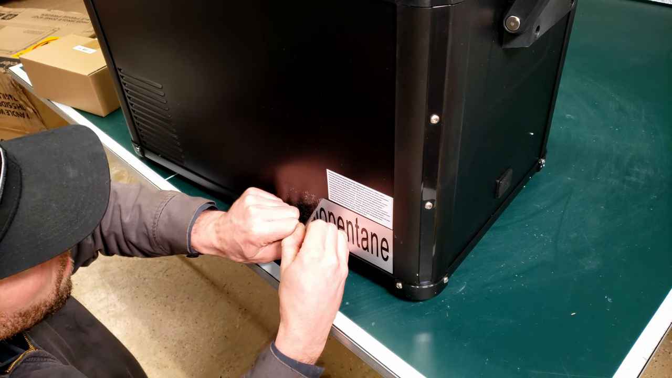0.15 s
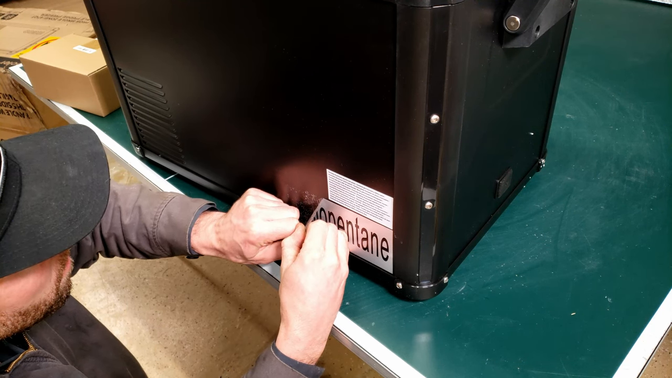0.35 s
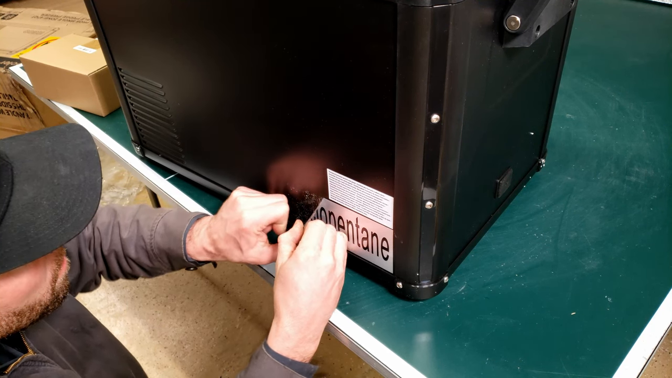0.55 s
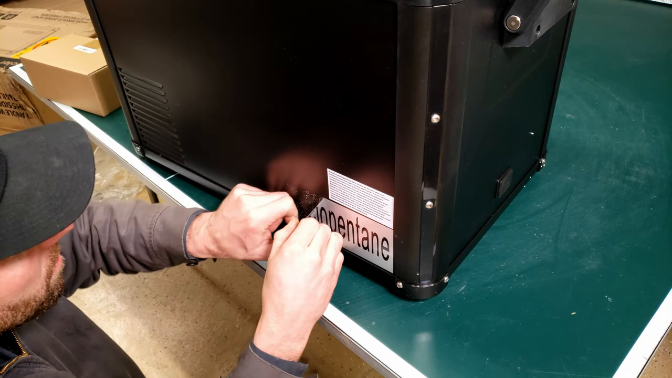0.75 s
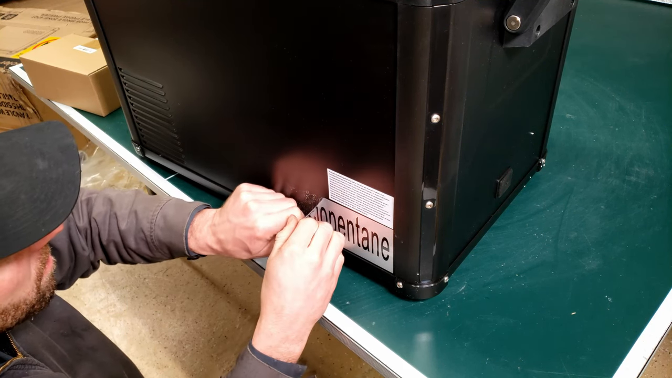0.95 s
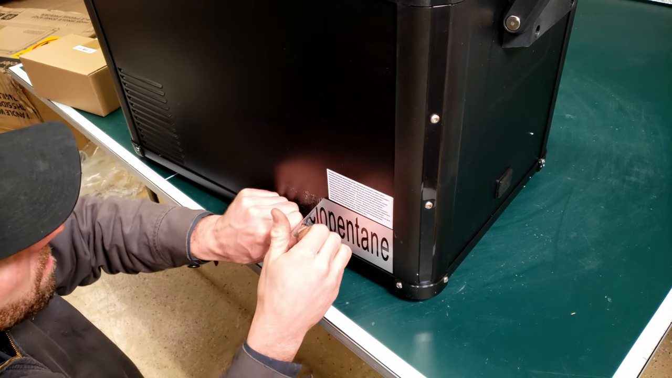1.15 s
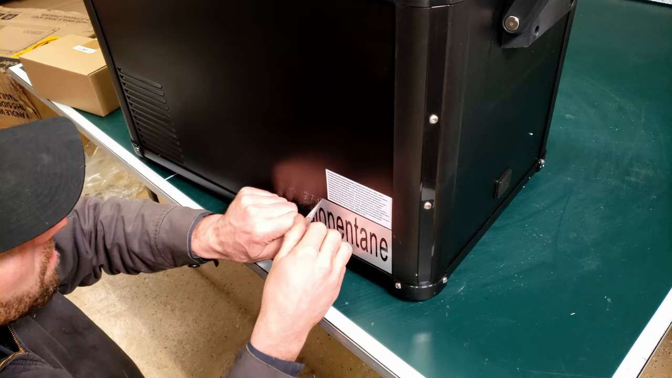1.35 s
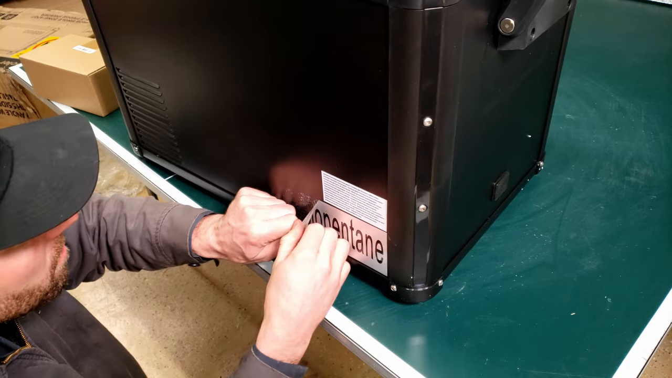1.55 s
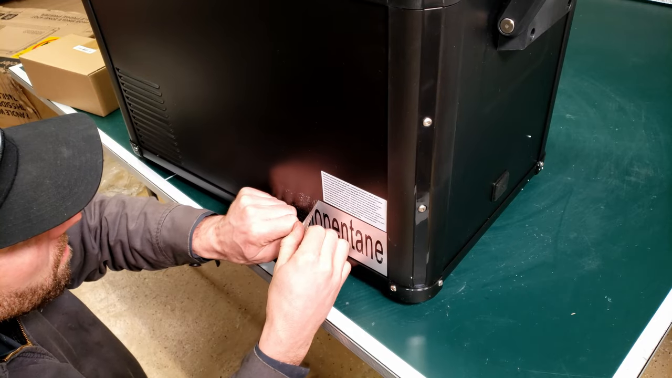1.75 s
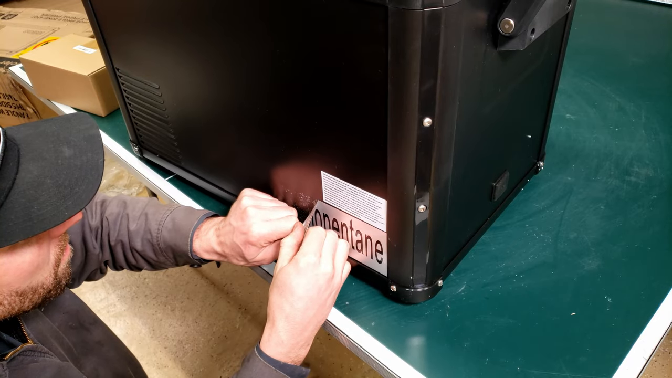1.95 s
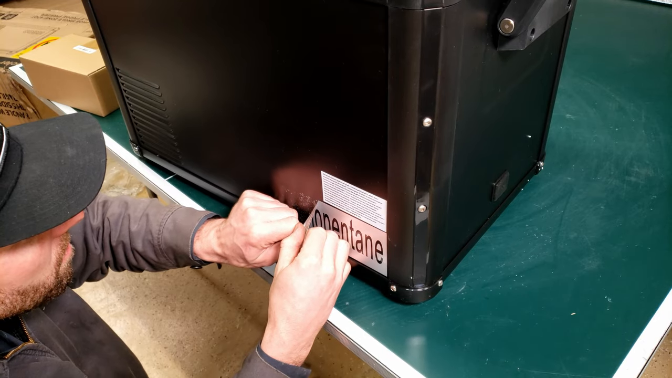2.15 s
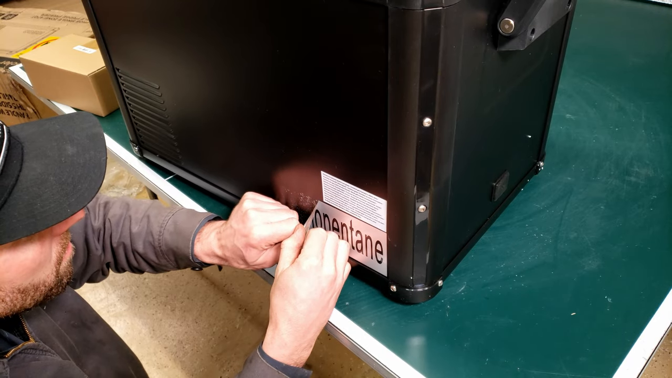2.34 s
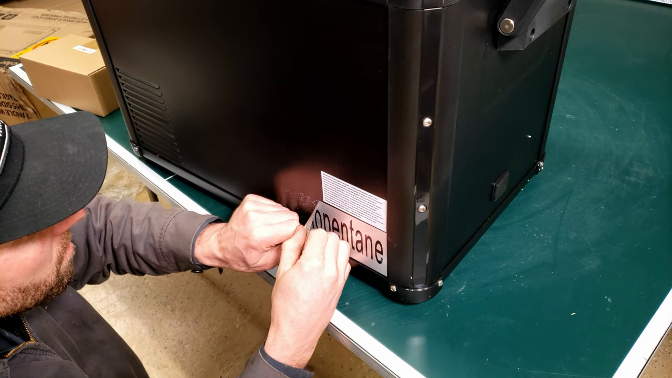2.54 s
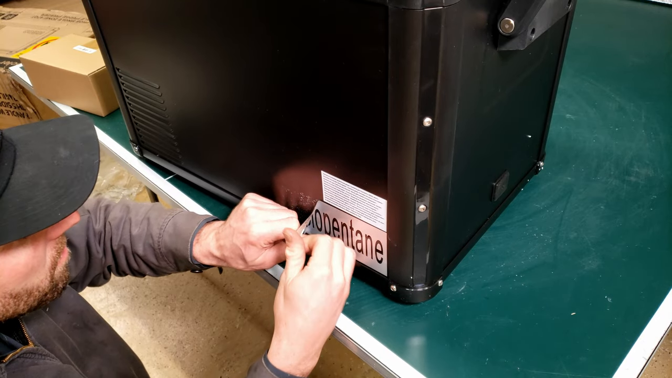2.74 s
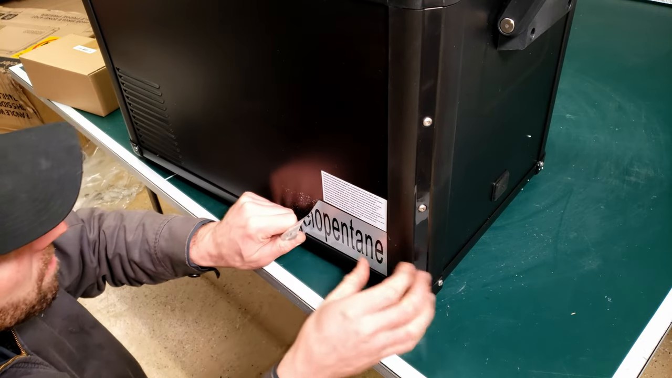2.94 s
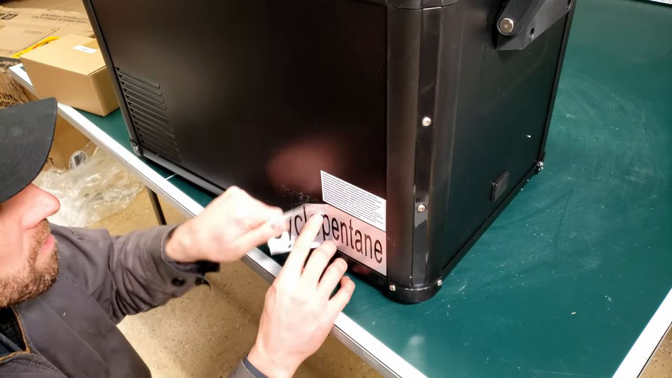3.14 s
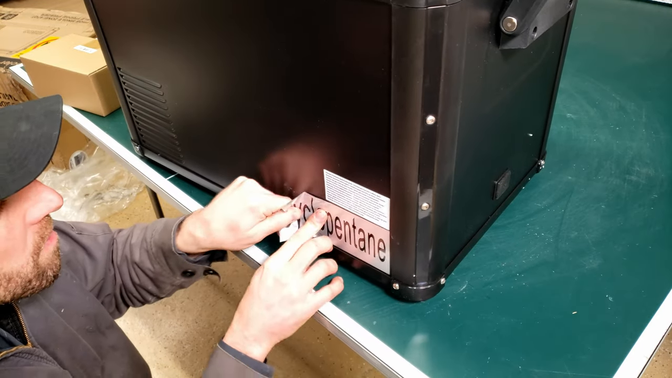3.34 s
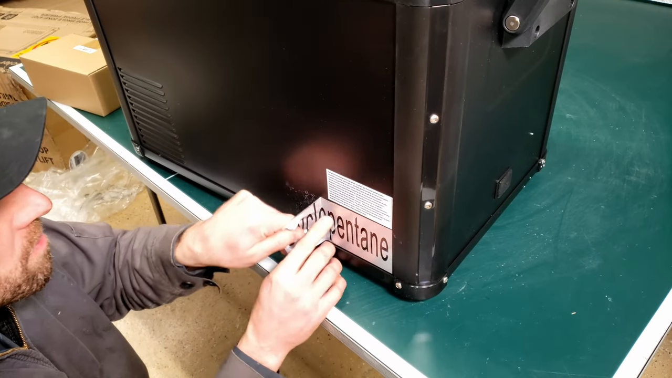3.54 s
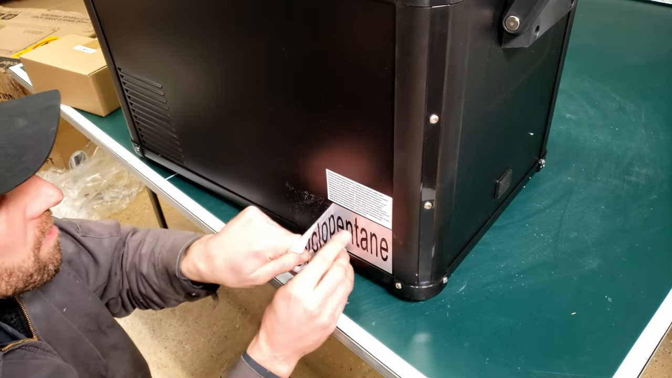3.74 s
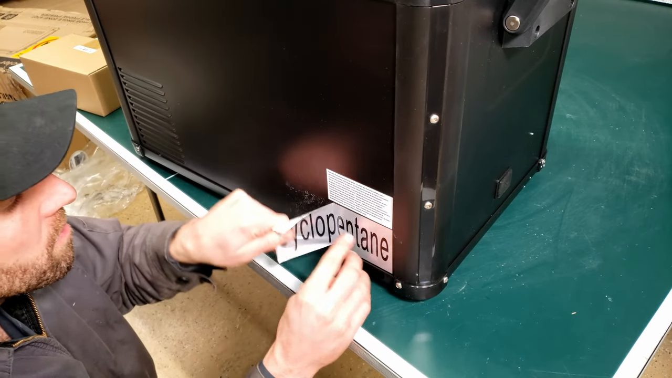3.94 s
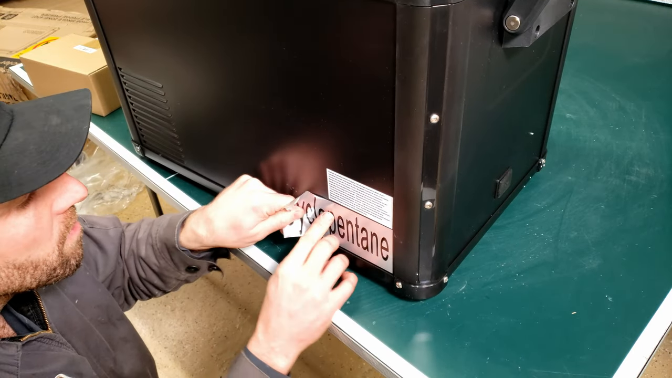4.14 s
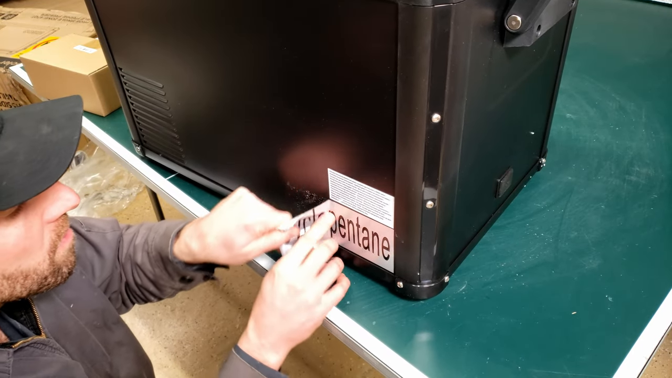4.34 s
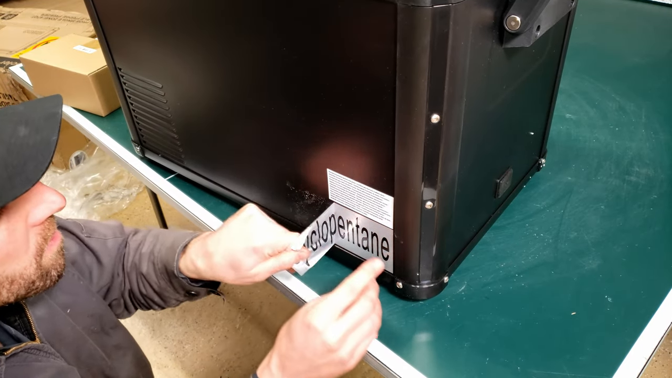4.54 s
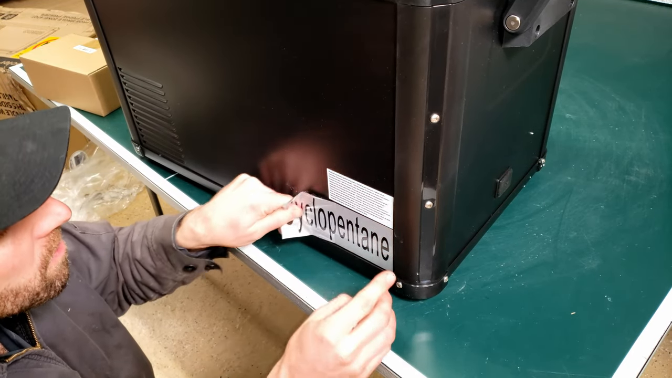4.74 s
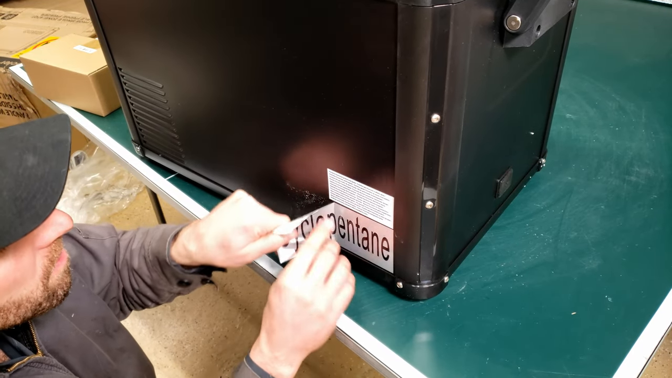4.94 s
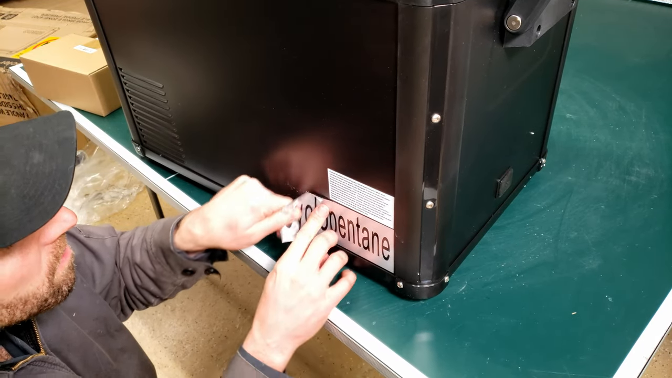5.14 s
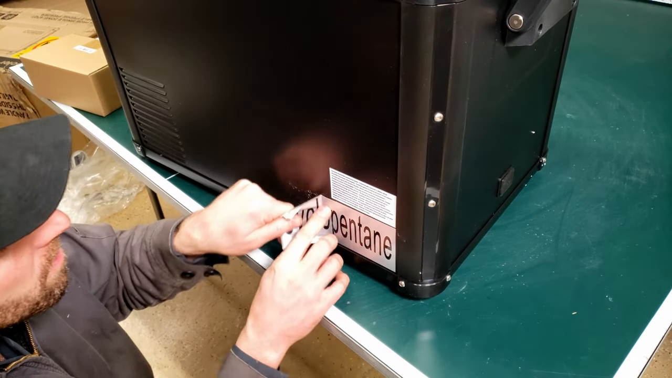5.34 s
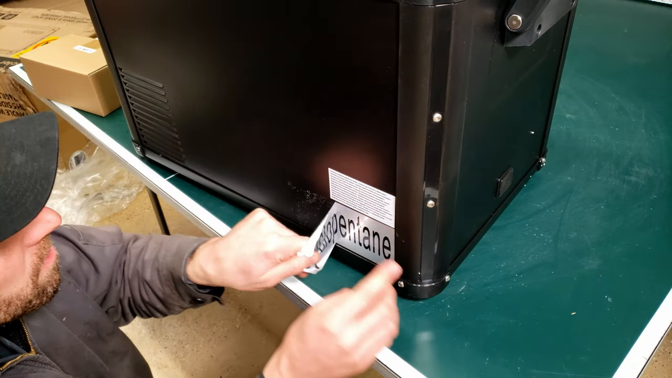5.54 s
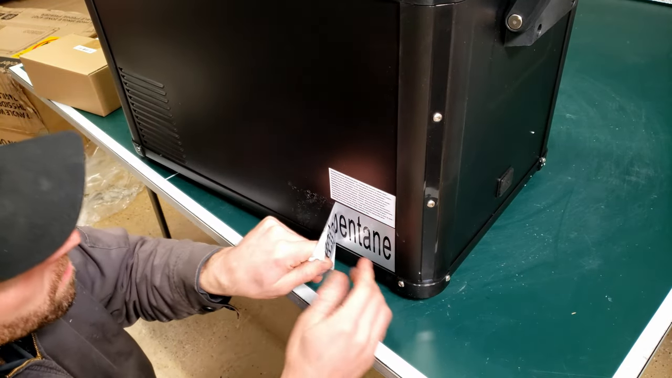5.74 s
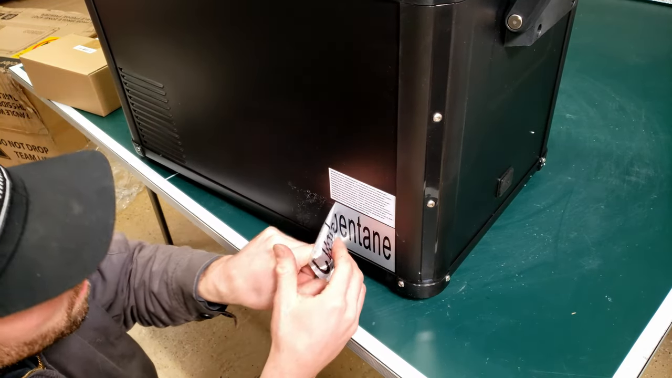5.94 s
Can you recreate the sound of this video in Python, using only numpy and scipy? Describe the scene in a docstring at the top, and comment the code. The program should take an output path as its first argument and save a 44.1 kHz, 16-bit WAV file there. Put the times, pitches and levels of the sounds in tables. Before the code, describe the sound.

Fingers pick at a stubborn adhesive label on a metal cabinet. Glue lets go in tiny dry clicks: a delicate sizzle first, a quick bright rip, isolated ticks, another slow creep, then uneven tugs that crackle and pop, some making the panel resonate briefly. Sleeves rub softly and fingertips thud dully. Close stereo pickup, slightly left, in a short-reverberant indoor room with faint hum and still air.

```python
"""Sticker torn off a fridge

A sticker is picked and torn off the side of a small fridge on a workshop table.
The glue lets go in tiny slips: a fine fizz when it creeps, crackling rips and single snaps when tugged.
Random clicks stand for the slips; filtered, they sound as the loose flap, the glue line and the metal panel.
Shaped noise gives rubbing hands, sagging sines soft bumps; a faint hum, still air and a short room surround them."""
import sys
import numpy as np
from scipy import signal
from scipy.fft import rfft, irfft
from scipy.io import wavfile
from scipy.ndimage import uniform_filter1d

SR = 44100
rng = np.random.default_rng(int(sys.argv[2]) if len(sys.argv) > 2 else 0)


def store_pcm(level_fs):
    """Save levels as 16-bit WAV."""
    pcm = np.round(np.clip(level_fs, -1, 1) * 32767).astype(np.int16)
    wavfile.write(sys.argv[1], SR, np.atleast_2d(pcm).T)


N = 268304
TIME = np.arange(N) / SR

# Tugs at the sticker. Levels are relative, ahead of the filters and trims of the radiating parts.
# Each row: start in seconds, swelling in seconds, easing in seconds, swell in dB, flap drive at the crest in dB,
# then the shares of panel, sharp crack and sizzle against the flap in dB.
TUGS = [ (0.463, 0.046, 0.028, 14.5, -39.5, -10.5, -2, 1.5), (0.538, 0.048, 0.02, 2.5, -35, -7, -15, -8.5),
        (1.052, .016, 0.015, 13, -48.5, 1, 0, 4), (1.247, 0.017, 0.015, 5.5, -65, 2.5, -2, 0.5),
        (1.354, 0.059, .012, 8.5, -50.5, -5, -7, -8), (2.653, 0.0084, 0.024, 15.5, -61, 0.5, 5.5, 5.5),
        (2.684, 0.027, 0.041, 17, -43.5, -11.5, -0.5, -3.5), (2.954, 0.056, 0.026, 1, -61, 1.5, -3, 3),
        (3.122, 0.03, .044, 13, -52, -13, -6.5, -2.5), (3.369, 0.047, 0.031, 5.5, -50.5, -11, -3, -0.5),
        (3.462, 0.013, 0.012, 28, -50, 0.5, 3.5, 2), (3.669, 0.027, 0.02, 7, -28.5, 4.5, 1, 3),
        (3.955, 0.094, 0.012, 3.5, -61.5, -4, -2, 2.5), (4.207, 0.011, 0.004, 7.5, -58, -4.5, 4, -9),
        (4.288, 0.069, .008, 11.5, -40.5, -7, -3.5, 0), (4.37, 0.044, 0.032, 1.5, -32.5, 2.5, 2.5, 5),
        (4.672, .020, 0.045, 11.5, -51.5, -10, -4, -4.5),
        (4.872, 0.061, 0.014, 11.5, -42.5, -17, -4.5, -1.5), (5.090, 0.09, .012, 13, -66, -6, -1.5, -0.5),
        (5.342, 0.081, 0.0051, 22.5, -51, -4.5, 1, 0.5), (5.434, 0.025, .028, 5.5, -25.5, 0.5, -1.5, 3),
        (5.813, .018, .054, 0, -74, 8, 7, 2), (5.979, 0.019, 0.02, 11.5, -61.5, 0, 6.5, 3.5),
        (6.045, 0.026, 0.013, 17, -61, -5, 4, 7), ]
# Single snaps of the glue. Levels are relative, ahead of later trims.
# Each row: time in seconds, peak in dB, panel share in dB, sizzle share in dB, ring of the flap in Hz.
GLUE_SNAPS = [(0.033, -38, -36, -4.5, 3990), (0.3471, -45.5, -16, -2.5, 3900),
              (0.4599, -34.5, -20, 6, 6970), (0.49, -30.5, -17, -13.5, 3260),
              (0.5017, -20.5, -21.5, -12, 1835), (0.513, -18, -29, -9, 3320),
              (0.5376, -15.5, -22.5, -2, 5780), (0.5445, -14, -28.5, -5, 2170),
              (0.5515, -12, -19, -28, 3420), (0.5579, -8.5, -43, -11.5, 2620),
              (0.5642, -15, -25, -2.5, 3190), (0.5725, -12, -30, -18, 2860),
              (0.5826, -11.5, -17, -20, 2750), (1.039, -41, -3, -21, 1600), (1.064, -45, 6, -9, 6750),
              (1.158, -46.5, 1, -12.5, 1320), (1.3997, -22, -17.5, -9, 2930), (1.5836, -39, -23, 5.5, 6800),
              (1.8926, -31.5, -37, -14, 4560), (1.9489, -40, -40, -15, 4560), (2.2202, -41.5, -47, 0, 1590),
              (2.275, -31.5, -36.5, -15, 3280), (2.304, -41, -39, -14, 1610), (2.337, -40, -32, -13, 3430),
              (2.4074, -37.5, -29, -8.5, 3020), (2.713, -28, -34.5, -11, 2570),
              (2.7399, -18, -9, -10, 2600), (2.9592, -37, -32, -3, 6500), (2.9745, -41.5, -18, 2, 6170),
              (3.0094, -30.5, -8, -8, 6400), (3.0417, -31, -12, -5.5, 6630), (3.0679, -38.5, 0, -30, 2020),
              (3.3482, -40, -24.5, 0.5, 3660), (3.477, -28.5, -38, -1.5, 2670), (3.666, -23, 10, 3.5, 1285),
              (3.6848, -12.5, -15, -7, 1200), (3.7013, -21.5, -6.5, -12, 5420),
              (3.7129, -9.5, -29, -30.5, 3000), (3.8868, -46, -3, 1.5, 1750), (4.2905, -30.5, -9, -6, 3700),
              (4.3146, -21, 0.5, -4, 3815), (4.352, -22, -12, -9, 2370), (4.362, -18.5, -11.5, -2.5, 6640),
              (4.3721, -18, -10, -2, 1935), (4.3882, -26, -23, -6.5, 6680), (4.4039, -14, -9.5, -2.5, 6700),
              (4.4154, -13.5, -3, -6.5, 6430), (4.6705, -45, -29, 2, 6600),
              (4.6903, -32.5, -11.5, -5.5, 6550), (4.8566, -37.5, -18.5, -23, 3900),
              (4.8797, -32.5, -20, -7, 2560), (4.9231, -20, -14.5, -4, 6560),
              (5.1607, -41.5, -4.5, -4, 4200), (5.397, -34.5, -10.5, 0, 2040), (5.4312, -15, 5, 2.5, 1356),
              (5.447, -15.5, 0, 3.5, 1190), (5.454, -7.5, -22.5, -7.5, 1855), (5.817, -38, -16, -4, 6400),
              (5.8379, -28, -16, -14, 5770), (5.88, -32, -13, -15, 7000), (5.9588, -40, -11, -12, 2600)]


def from_db(db):
    """Logarithmic level: 20 dB is a tenfold amplitude."""
    return 10 ** (np.asarray(db) / 20)


def at_hz(points, hz):
    """Logarithmic pitch scale: a table is read along straight lines over log frequency."""
    known_hz, values = np.transpose(points)
    return np.interp(np.log(np.maximum(hz, 1)), np.log(known_hz), values)


def panned(left_db):
    """Interaural level difference: half is added on the left, half taken off the right."""
    return from_db(np.array([[.5], [-.5]]) * left_db)


def unit_energy(x):
    """Parseval's relation: a response of unit energy keeps the power of white noise."""
    return x / np.sqrt(np.sum(x ** 2, axis=-1, keepdims=True))


def convolved(x, response):
    """Linear superposition: every sample sets off its own copy of the response."""
    return signal.oaconvolve(np.atleast_2d(x), np.atleast_2d(response), axes=-1)[:, :N]


def coloured(x, spectrum, size=4096):
    """Minimum phase: folding the cepstrum forward in time gives a causal filter of the given spectrum."""
    spectrum_gain = from_db(at_hz(spectrum, np.fft.rfftfreq(size, 1 / SR)))
    cepstrum = irfft(np.log(spectrum_gain))
    cepstrum[1:size // 2] *= 2
    cepstrum[size // 2 + 1:] = 0
    return convolved(x, unit_energy(irfft(np.exp(rfft(cepstrum)))))


def resonance(hz, width_hz):
    """Damped resonance: a pole pair forms a band-pass with gain 1 on top."""
    r = np.exp(-np.pi * width_hz / SR)
    return (1 - r * r) / 2 * np.array([1, 0, -1]), [1, -2 * r * np.cos(2 * np.pi * hz / SR), r * r]


def gliding(x, hz, width_hz, size=256):
    """Time-varying resonance: the centre moves block by block, scaled to keep the power of white noise."""
    out, state = np.zeros_like(x), np.zeros((2, 2))
    for i in range(0, N, size):
        block = slice(i, i + size)
        out[:, block], state = signal.lfilter(*resonance(hz[i], width_hz), x[:, block], zi=state)
    return out * np.sqrt(SR / (np.pi * width_hz))


def drift(per_s):
    """Band-limited fluctuation: straight lines join normal random values drawn per_s times a second."""
    return np.interp(TIME * per_s, np.arange(N), rng.standard_normal(N))


def stereo_noise(alike):
    """Interchannel coherence: a share of the noise power is common to both sides."""
    alike = np.clip(alike, 0, 1)
    return np.sqrt(alike) * rng.standard_normal(N) + np.sqrt(1 - alike) * rng.standard_normal((2, N))


def slips(per_s, spread_db, even_s):
    """Stick-slip as a point process: random uneven clicks, held by the steady pull to a local mean power of 1."""
    happens = rng.random(N) < per_s / SR
    sizes = from_db(spread_db * rng.standard_normal(N))
    clicks = happens * sizes * rng.choice([-1, 1], N)
    power = uniform_filter1d(clicks ** 2, int(even_s * SR))
    return clicks / np.sqrt(np.maximum(power, 1e-9))


def shiver(clicks, ring_s, sharp, alike):
    """Impulse and diffuse decay: each click is a spike plus a brief disorderly shiver of the film."""
    r, sharp = np.exp(-1 / (ring_s * SR)), np.clip(sharp, 0, 1)   # ring_s is the decay time of the power
    power = signal.lfilter([1 - r], [1, -r], clicks ** 2 + 1e-18)
    return np.sqrt(sharp) * clicks + np.sqrt((1 - sharp) * power) * stereo_noise(alike)


def stroke(start_s, swell_s, ease_s, swell_db, ease_db):
    """Force envelope: a movement sets in, swells to a crest of 1, eases and stops."""
    touch_s = 0.0058   # the ramp at either end
    crest_s, end_s = start_s + swell_s, start_s + swell_s + ease_s
    touching = np.clip(np.minimum(TIME - start_s, end_s - TIME) / touch_s + .5, 0, 1)
    return touching * from_db(np.interp(TIME, [start_s, crest_s, end_s], [-swell_db, 0, -ease_db]))


def background():
    """Stationary sound: coloured noise for still air, and one faint, slightly wavering sine as a hum."""
    # Colour of the air. Each row: frequency in Hz, density in dB per Hz.
    air_colour = [(25, -25), (60, -4.5), (120, -11), (270, -10), (600, -13.5), (1200, -28), (4400, -27.5),
                  (6500, -20.5), (8400, -36), (12000, -22), (16000, -21)]
    hum_hz, hum_db, air_db = 360.3, -72.5, -72   # levels as rms, ahead of panning
    hum = np.sqrt(2) * np.sin(2 * np.pi * hum_hz * TIME) * from_db(hum_db + .5 * drift(per_s=0.94))
    air = from_db(air_db) * coloured(stereo_noise(alike=0.31), air_colour)
    return hum * panned(1.5) + air * panned(0.83)


def workshop(x, wet_db=-5.5, bass_db=2.5, bass_hz=420, near_db=-10, near_s=0.0081, near_hz=1500,
             build_s=0.0047):
    """Reverberation: quick treble scatter from table and arms, then a diffuse tail that dies sooner in the treble."""
    # Decay of the room. Each row: frequency in Hz, time to fall by 60 dB in seconds.
    room_t60 = [(150, 0.4), (500, 0.37), (1500, 0.33), (4000, 0.33), (7000, 0.33), (11000, 0.22),
                (16000, 0.18)]
    age = TIME[:int(.7 * SR)]
    edges = np.geomspace(60, 18000, 19)
    white, tail = rng.standard_normal((2, 2, len(age))), 0
    for k, (low, high) in enumerate(zip(edges, edges[1:])):
        hz = np.sqrt(low * high)
        band_pass = signal.butter(2, [low, high], "band", fs=SR, output="sos")
        noise = signal.sosfilt(band_pass, white[k % 2])
        decay = from_db(-60 * age / at_hz(room_t60, hz))
        band = unit_energy(noise * decay * (1 - np.exp(-age / build_s)))
        if hz < bass_hz:   # long waves reach both sides alike
            band = from_db(bass_db) * band[[0, 0]]
        tail = tail + band * np.sqrt(2 * (high - low) / SR)
    near = unit_energy(rng.standard_normal(tail.shape) * np.exp(-age / near_s) * (age > .001))
    near = signal.sosfilt(signal.butter(2, near_hz, "high", fs=SR, output="sos"), near)
    return convolved(x, from_db(wet_db) * tail + from_db(near_db) * near)


def bumps(thud_db=2.0, puff_db=-8.0, rise_s=0.0039):
    """Contact stiffness: a soft thud sags in pitch as the pressure eases, with a dull puff of noise."""
    # Fingers taking a new grip. Each row: time in seconds, relative level in dB, starting pitch in Hz.
    grips = [(3.296, -54.5, 196), (3.392, -48, 204), (3.473, -52.5, 194), (4.101, -43.5, 212.5),
             (4.412, -42, 206.5), (5.229, -45.5, 203.8)]
    # Colour of the puff. Each row: frequency in Hz, density in dB per Hz.
    puff_colour = [(50, -22.5), (130, -13.5), (180, -6.5), (250, -5.5), (330, 6.5), (480, -11.5),
                   (700, -11.5), (1500, -46)]
    out, age = np.zeros(N), TIME[:SR // 4]
    sag = .27   # fraction of the pitch that is lost
    sag_s, decay_s, puff_s = .02, .019, .016
    puff = coloured(rng.standard_normal(N), puff_colour)[0]
    for s, level_db, hz in grips:
        span = slice(round(s * SR), round(s * SR) + len(age))
        # integral of the sagging pitch
        phase = 2 * np.pi * hz * ((1 - sag) * age + sag * sag_s * (1 - np.exp(-age / sag_s)))
        thud = from_db(thud_db) * np.sin(phase) * np.exp(-age / decay_s)
        air = from_db(puff_db) * puff[span] * np.exp(-age / puff_s)
        out[span] += from_db(level_db) * (1 - np.exp(-age / rise_s)) * (thud + air)
    return out * panned(2.3)


def hands():
    """Friction noise: sleeves rub on the table and fingertips scuff over the panel in small catches."""
    # Strokes of hands and sleeves. Each row: start in seconds, swelling in seconds, easing in seconds,
    # low rub in dB, skin scuff in dB (relative levels).
    strokes = [ (0.418, 0.02, 0.087, -55, -72), (0.497, 0.022, .060, -60, -48.5),
               (0.721, 0.032, 0.042, -64, -77), (0.893, 0.033, 0.083, -62.5, -52.5),
               (1.030, 0.033, .020, -65, -53.5), (1.244, 0.027, 0.089, -69, -67),
               (1.349, .028, 0.09, -61.5, -50.5), (1.450, 0.12, 0.046, -68, -75),
               (2.954, 0.26, 0.12, -67.5, -62.5), (3.300, 0.16, 0.25, -61.5, -62.5),
               (3.878, 0.24, 0.24, -63, -66.5), (4.420, 0.037, 0.14, -64.5, -50.5),
               (4.680, 0.013, 0.076, -64.5, -59), (4.876, 0.036, 0.17, -62.5, -53.5),
               (5.808, 0.023, 0.25, -69, -82), ]
    # Colours of rub and scuff. Each row: frequency in Hz, density in dB per Hz.
    rub_colour, scuff_colour = [(25, -37), (70, -1.5), (130, -5), (185, 4.5), (280, 1.5), (450, 3.5),
                                (900, -33.5)], [(200, -14), (450, 4.5), (800, 7.5), (1500, 0.5), (2500, -9.5),
                                             (6000, -8.5), (16000, -40)]
    swell_db, ease_db = 10, 12   # every stroke presses harder, then lifts away
    rubbing, scuffing = np.zeros((2, N))
    for *timing, rub_db, scuff_db in strokes:
        pressure = stroke(*timing, swell_db, ease_db)
        rubbing += from_db(rub_db) * pressure
        scuffing += from_db(scuff_db) * pressure
    rub = coloured(stereo_noise(alike=0.84) * rubbing, rub_colour)
    catches = shiver(slips(per_s=350, spread_db=6.5, even_s=.05), ring_s=.0025, sharp=.3, alike=.7)
    scuff = coloured(catches * scuffing, scuff_colour)
    return (rub + from_db(-5.0) * scuff) * panned(3.5)


def twang():
    """Free vibration: a low mode of the panel rings on when a hard tug lets go."""
    # The ring: time in seconds, level in dB, frequency in Hz, time to fall by 60 dB in seconds.
    s, peak_db, hz, t60 = (3.712, -39, 398, .34)
    age = np.maximum(TIME - s, 0)
    return np.sin(2 * np.pi * hz * age) * from_db(peak_db - 60 * age / t60) * panned(3.0)


def creep(flutter_db=1.5, overtone=1.4, overtone_db=-11.5, lowest_hz=2100):
    """Resonance and length: fine threads of glue break, and the flap's two resonances sink as it grows longer."""
    # Slow, steady pulls. Each row: start in seconds, end in seconds, relative fizz level in dB, fading in dB per s,
    # sizzle share in dB, starting resonance of the flap in Hz, its sag in octaves per s.
    pulls = [(0.0, 0.459, -57, 26.5, 0.5, 3450, 0.02), (1.445, 2.666, -59, 0.5, -2, 5350, 0.77)]
    # Bending of the flap in the longer pull: start, swelling and easing in seconds.
    bend = (1.78, .50, .36)
    # Colours of fizz and edge. Each row: frequency in Hz, density in dB per Hz.
    fizz_colour, edge_colour = [(600, -22), (2000, -17.5), (3000, -1.5), (5000, -7), (6800, -1),
                                (8000, -14.5), (10000, -13.5)], [(6000, -35), (8500, -25), (10000, -6.5), (12500, 0),
                                              (15500, 0), (18000, -36)]
    bend_db = -69.5   # relative, at the crest
    pull, sizzle, flap_hz = np.zeros((3, N))
    for start_s, end_s, fizz_db, fade_db_per_s, share_db, start_hz, sag in pulls:
        during = (TIME >= start_s) & (TIME < end_s)
        age = TIME[during] - start_s
        pull[during] = from_db(fizz_db - fade_db_per_s * age)
        sizzle[during] = from_db(share_db)
        flap_hz[during] = start_hz * 2 ** (-sag * age)
    clicks = slips(per_s=1200, spread_db=4.5, even_s=0.031) * from_db(flutter_db * drift(per_s=88))
    threads = shiver(clicks, ring_s=0.0016, sharp=0.24, alike=0.11)
    fizz = signal.sosfilt(signal.butter(2, lowest_hz, "high", fs=SR, output="sos"), threads * pull)

    flap_hz = np.interp(TIME, TIME[pull > 0], flap_hz[pull > 0])   # bridges the gaps between pulls
    flap_hz = flap_hz * (1 + .085 * drift(per_s=70))
    width_hz = 700
    flap = gliding(fizz, flap_hz, width_hz)
    flap = flap + from_db(overtone_db) * gliding(fizz, overtone * flap_hz, width_hz)

    flexing = stroke(*bend, swell_db=11, ease_db=11) * from_db(6 * drift(per_s=45))
    bending = gliding(threads * flexing, np.full(N, 1560), width_hz=200)
    bending = signal.lfilter(*resonance(hz=1560, width_hz=700), bending)

    edge = shiver(clicks * pull * sizzle, ring_s=0.0006, sharp=0.034, alike=.03)
    edge = coloured(edge, edge_colour)
    film = from_db(-4.0) * flap + from_db(-10.0) * coloured(fizz, fizz_colour)
    return (film + from_db(bend_db) * bending + edge) * panned(1.3)


def flap_rings(ring_db=-5.0, give_s=0.000929):
    """Damped oscillation: after each snap the taut flap swings for about two cycles at a pitch of its own."""
    out, age = np.zeros(N), TIME[:SR // 100]
    for s, peak_db, _, _, hz in GLUE_SNAPS:
        swing = np.sin(2 * np.pi * hz * age) * np.exp(-age * hz / 2)
        at = round((s + give_s) * SR)
        out[at:at + len(age)] += from_db(peak_db + ring_db) * swing[:N - at]
    radiating = signal.butter(2, 800, "high", fs=SR, output="sos")   # keeps the swings free of bass and of any steady offset
    return signal.sosfilt(radiating, out) * panned(1.0)


def ticks(above_db=6.5, spread_db=6.0, panel_db=-7.5, crack_db=2.0, edge_db=3.5, count=3):
    """Precursory fracture: a few threads break just before each tug, louder, up to a limit, for a harder start."""
    start_s, _, _, swell_db, level_db = np.transpose(TUGS)[:5, :, None]
    lead_s, loudest_db = .035, -48   # the limit holds ahead of the random spread
    early = rng.uniform(0, lead_s, (len(TUGS), count))
    typical_db = np.minimum(level_db - swell_db + above_db, loudest_db)
    peak_db = typical_db + spread_db * rng.standard_normal(early.shape)
    at = (np.maximum(start_s - early, 0) * SR).astype(int).ravel()
    drives = np.zeros((4, N))
    drives[:, at] = np.outer(from_db([0, panel_db, crack_db, edge_db]), from_db(peak_db))
    return drives


def snaps(strength_db=3.0, panel_extra_db=5.5, edge_extra_db=10.0, stiff_hz=3500, tilt_db=3.0, give_s=.001):
    """Sudden release of strain: a larger patch of glue gives at once; the stiffer the flap, the sharper the crack."""
    s, peak_db, panel_db, sizzle_db, hz = np.transpose(GLUE_SNAPS)
    sharp_db = tilt_db * np.log2(hz / stiff_hz)   # tilt in dB per octave of flap pitch
    shares = from_db([-sharp_db, panel_db + panel_extra_db, sharp_db, sizzle_db + edge_extra_db])
    drives = np.zeros((4, N))
    drives[:, np.round((s + give_s) * SR).astype(int)] = from_db(peak_db + strength_db) * shares
    return drives


def rips():
    """Stick-slip: a tug tears the glue in irregular slips, faster when harder; drives flap, panel, crack and edge."""
    ease_db = 10.5   # a tug slackens this much after its crest, then the glue holds again
    # slips at the mean strength; this much more strength doubles their rate
    slips_per_s, haste_db = 900, 29.5
    drives, per_s = np.zeros((4, N)), np.zeros(N)
    mean_db = np.mean(TUGS, axis=0)[4]
    for start_s, swell_s, ease_s, swell_db, level_db, *shares_db in TUGS:
        force = stroke(start_s, swell_s, ease_s, swell_db, ease_db)
        drives += np.outer(from_db(level_db) * from_db([0, *shares_db]), force)
        per_s[force > 0] = slips_per_s * 2 ** ((level_db - mean_db) / haste_db)
    return drives * slips(per_s, spread_db=3.0, even_s=0.012)


def sticker(flap_clicks, panel_clicks, crack_clicks, edge_clicks, modes_db=9.5):
    """Modal radiation: slips sound from the flap's body, the parting glue line, the crisp edge and the panel."""
    # Modes of the fridge's side. Each row: frequency in Hz, own width in Hz, level in dB.
    panel_modes = [(532, 6, -2.5), (623.2, 25, 6.5), (673, 8.9, -15.5), (869, 3.3, 2.5), (936, 18, -1.5),
                   (1217, 32, 2.5), (1328, 41, 0.5), (1437, 52, -0.5), (1688, 20, 6), (1818, 8.5, -0.5),
                   (2600, 52, -7.5), (2730, 10, -14.5)]
    # Colours of the radiating parts. Each row: frequency in Hz, density in dB per Hz.
    panel_colour, flap_colour = [(40, -59), (100, -27), (170, -5.5), (270, -13), (420, -6), (620, -0.5),
                                 (900, 3.5), (1250, 0), (1700, -13), (3000, -29.5)], [(500, -45.5), (1100, -5.5), (1500, 3.5), (1900, 1),
                                                (2300, 3), (2800, 2), (3500, 1.5), (5000, -8),
                                                (9000, -29.5)]
    crack_colour, edge_colour = [(1800, -28), (3200, -7.5), (4000, 2), (5200, 2), (6700, 3), (8000, -7),
                                 (10000, -19)], [(4000, -58.5), (7000, -4), (8600, -8.5), (10000, -3),
                                                (12000, 0.5), (15500, -0.5), (18000, -6.5)]
    damping_hz = 12   # the foam behind the panel keeps every mode at least this wide
    flap = coloured(shiver(flap_clicks, ring_s=0.001, sharp=0.082, alike=0.36), flap_colour)
    crack = coloured(shiver(crack_clicks, ring_s=.0005, sharp=.15, alike=.1), crack_colour)
    edge = coloured(shiver(edge_clicks, ring_s=.0005, sharp=.22, alike=.03), edge_colour)
    push = shiver(panel_clicks, ring_s=0.0032, sharp=0.48, alike=0.58)
    # a small panel radiates little deep bass
    push = signal.sosfilt(signal.butter(2, 130, "high", fs=SR, output="sos"), push)
    ringing = 0
    for hz, width_hz, db in panel_modes:
        mode = resonance(hz, max(width_hz, damping_hz))
        ringing = ringing + from_db(db) * signal.lfilter(*mode, push)
    panel = from_db(-3.5) * coloured(push, panel_colour) + from_db(modes_db) * ringing
    film = from_db(-1.5) * flap + from_db(1.5) * crack + from_db(3.5) * edge
    return film * panned(1.0) + panel * panned(3.2)


def scene():
    """Superposition: the work at the fridge, a little to the left, is heard directly and through the room."""
    tearing = sticker(*(rips() + snaps() + ticks()))
    left, right = tearing + flap_rings() + creep() + hands()
    work = np.array([left, np.append(0, right[:-1])])   # the right side hears it a sample later
    thuds = bumps() + twang()   # soft and low: they stir the room less
    return work + thuds + workshop(work + .5 * thuds) + background()


def record(dry):
    """Band limiting: an elliptic low-pass cuts the top steeply above 16 kHz."""
    return signal.sosfilt(signal.ellip(10, .1, 80, 16000, fs=SR, output="sos"), dry)


dry = scene()
out = record(dry)
store_pcm(out)
```